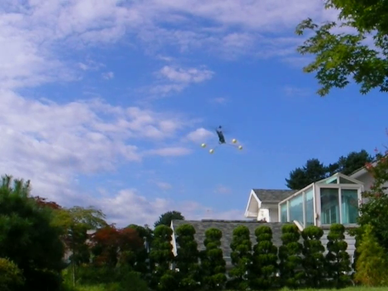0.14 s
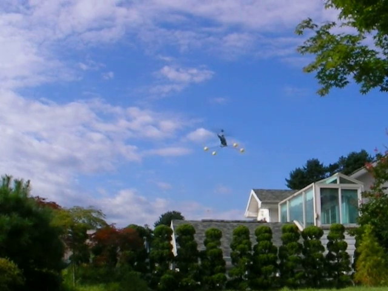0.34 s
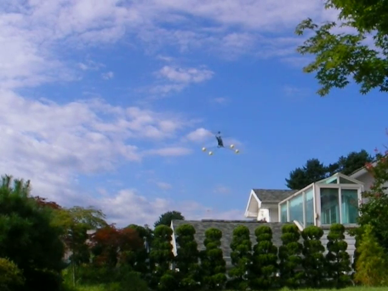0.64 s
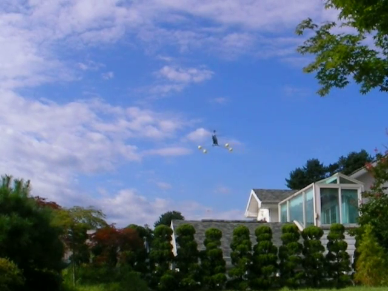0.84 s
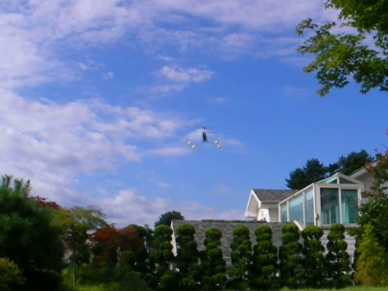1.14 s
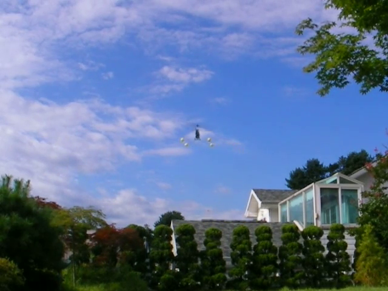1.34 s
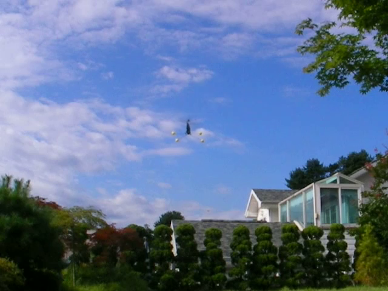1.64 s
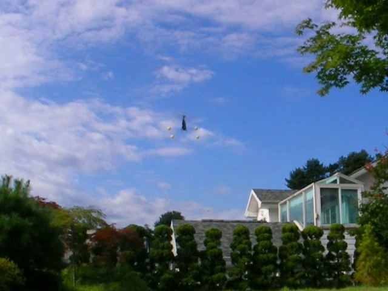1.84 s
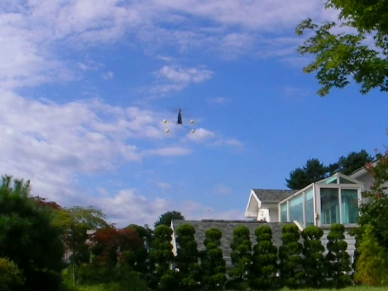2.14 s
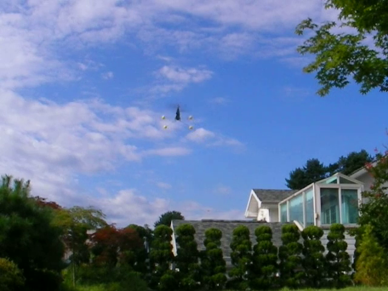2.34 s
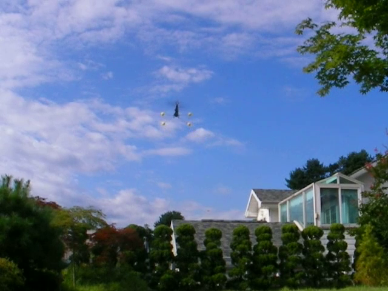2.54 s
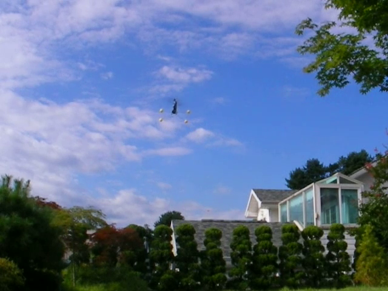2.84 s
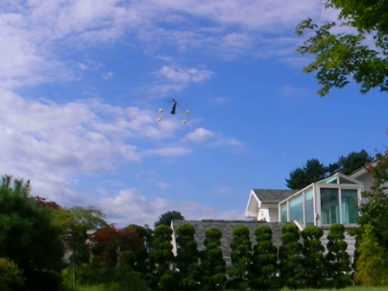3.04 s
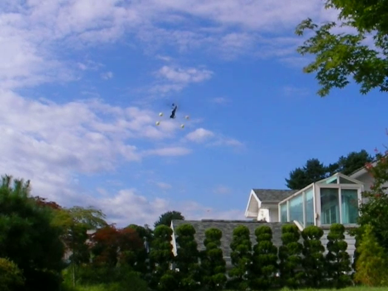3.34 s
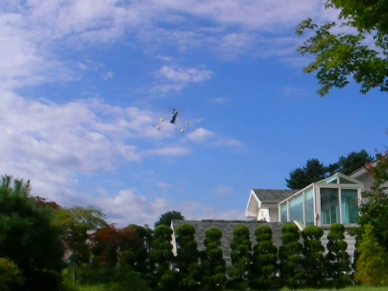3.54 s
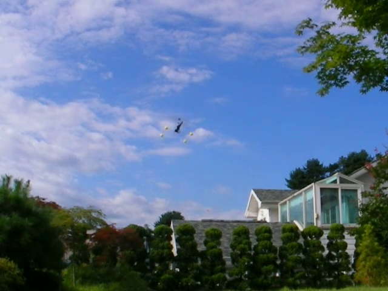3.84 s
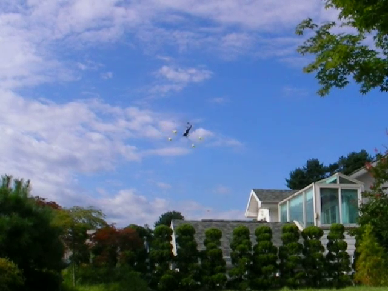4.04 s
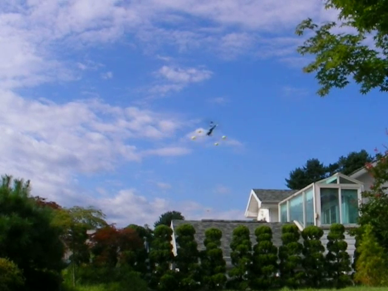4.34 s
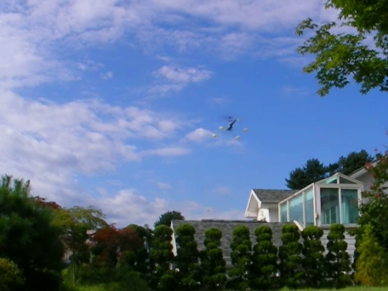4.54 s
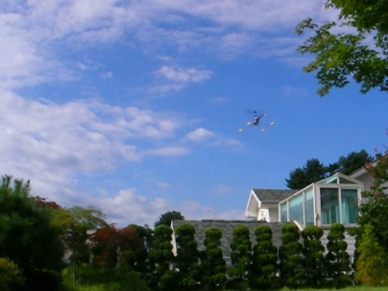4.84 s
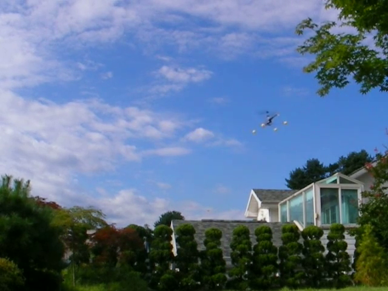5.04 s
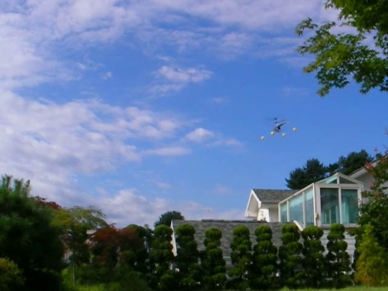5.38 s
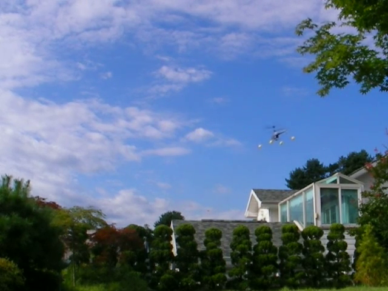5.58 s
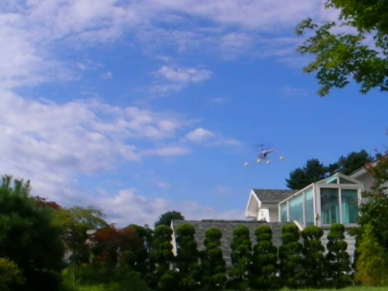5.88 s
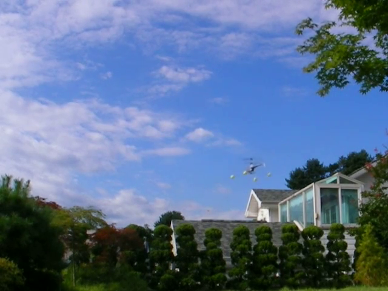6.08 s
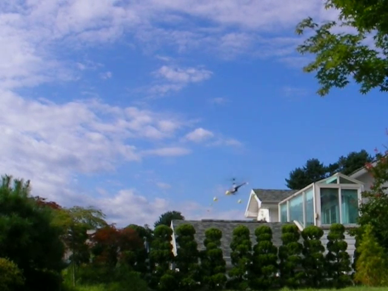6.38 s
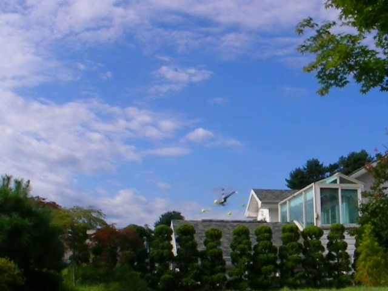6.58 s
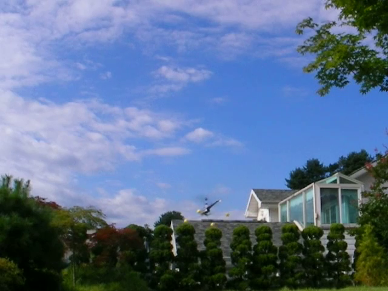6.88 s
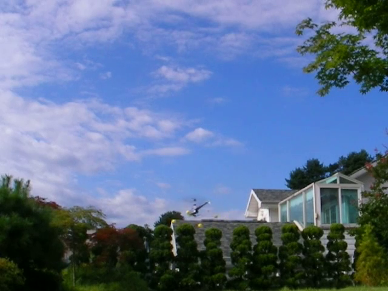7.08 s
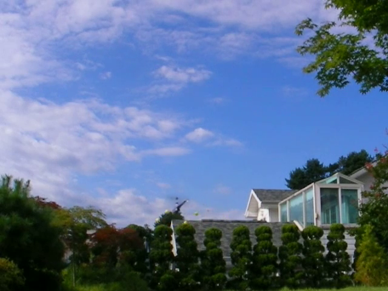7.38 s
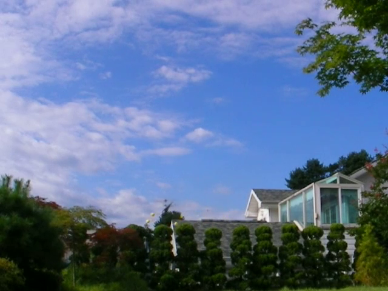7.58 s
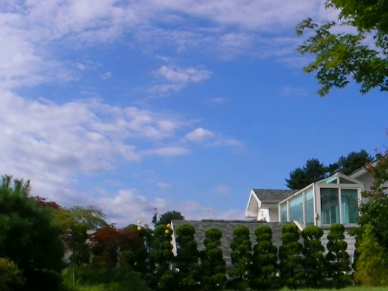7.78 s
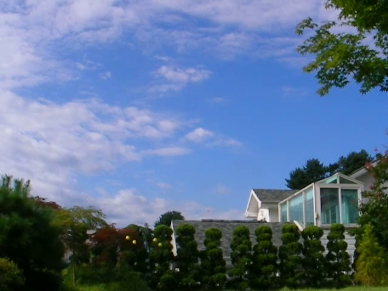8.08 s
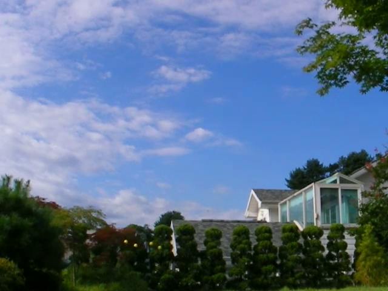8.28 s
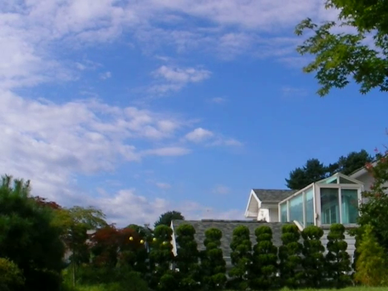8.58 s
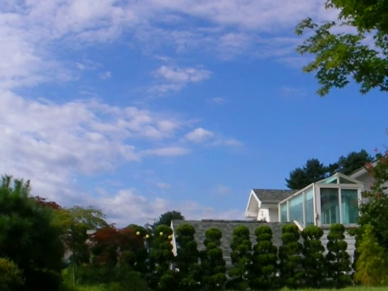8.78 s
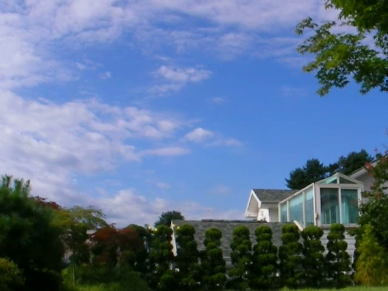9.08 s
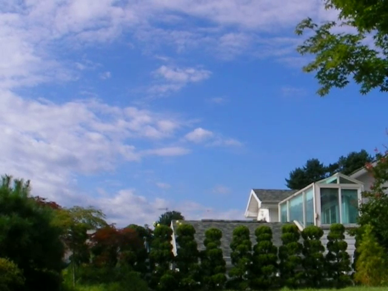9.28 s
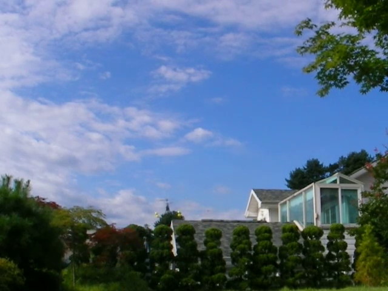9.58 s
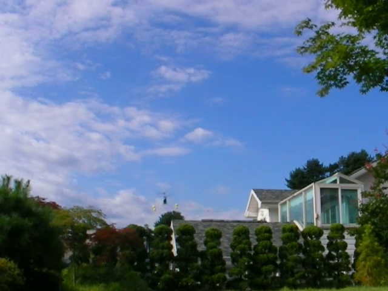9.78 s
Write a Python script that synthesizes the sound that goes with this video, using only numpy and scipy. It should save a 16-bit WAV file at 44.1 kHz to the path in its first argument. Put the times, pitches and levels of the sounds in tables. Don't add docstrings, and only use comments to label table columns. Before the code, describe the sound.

A small electric model helicopter whines and hisses over a windy garden, its pitch wavering, briefly sagging as power cuts, then recovering.

```python
import sys
import numpy as np
from scipy import signal
from scipy.fft import rfft, irfft
from scipy.io import wavfile
from scipy.ndimage import uniform_filter1d

SR = 44100
rng = np.random.default_rng(int(sys.argv[2]) if len(sys.argv) > 2 else 0)


def unload_audio(sound):
    columns = np.transpose(np.atleast_2d(sound))
    steps = np.round(np.clip(columns, -1, 1) * 32767)
    wavfile.write(sys.argv[1], SR, steps.astype(np.int16))


def to_linear_factor(level_db):
    exponent = np.asarray(level_db, float) / 20
    return 10 ** exponent


N = 437472
T = np.arange(N) / SR

# (frequency [Hz], likeness [0-1])
LIKENESS = [(60, 0.99), (300, 0.99), (700, 0.98), (1500, 0.82), (2500, 0.48), (4500, 0.45), (9000, 0.11),
            (13000, 0.53)]
# (time [s], buffeting [dB], tilt [dB per octave])
WIND = [(0.0, -15, 7), (0.5, -17.5, -4.5), (0.8, -16, -4), (1.0, -12.5, -1), (1.3, -14, 8), (1.5, -13.5, 1),
        (2.4, -16.5, 2), (3.1, -15, -3.5), (3.8, -15, -2), (4.15, -20, -4.5), (4.8, -18.5, -9),
        (5.6, -20.5, -2.5), (5.9, -21.5, -1.5), (6.7, -23.5, -1.5), (7.1, -18.5, -2.5), (7.7, -20.5, 2),
        (9.15, -29.5, -5.5), (9.92, -25, 2.5)]
# (frequency [Hz], density [dB per Hz])
BUFFET_COLOUR = [(12, -70), (20, -40), (27, -29), (35, -15), (43, -20), (135, -3.5), (177, 2.5), (272, -2),
                 (290, -5.5), (338, -21.5), (420, -25.5), (550, -35), (920, -120)]
# (frequency [Hz], density [dB per Hz])
RUSTLE_COLOUR = [(210, -11), (360, -9.5), (527, -6.5), (881, -8.5), (1680, -24), (2110, -22), (2790, -24.5),
                 (3500, -24.5), (4550, -43), (7700, -120)]
# (middle [s], half length [s], rustle [dB], low airflow [dB], tip hiss [dB])
GUSTS = [(0.0, 0.11, 3.5, -3, 1), (0.83, 0.019, 1.5, 3, 3), (0.9, .03, -2, -5, -4), (1.0, 0.018, 1, 2, 2),
         (1.08, 0.19, 6.5, -9, 1), (1.2, .03, -4, -3, -7), (1.27, 0.028, 1, -3, 4.5), (3.1, .3, 0, 0, 0),
         (5.5, 0.14, 2, -2, 2), (7.45, 0.45, 6, -1.5, -0.5), (8.3, 0.4, 2.5, -4, 0),
         (9.92, 0.091, 2.5, -1, -3)]
RUSTLE_DB, RUSTLE_SHARE, RUSTLE_FADE_DB_PER_S = -38, 0.58, -0.91
BUFFET_DIP_DB = -2.5

# (time [s], beat [Hz], beat level [dB], second overtone level [dB])
BEAT = [(0.0, 58.48, -31, -20.5), (2.4, 57.61, -29.5, -23), (3.9, 56.75, -31.5, -22),
        (5.2, 55.92, -35, -30.5), (5.6, 53.6, -47, -24.5), (7.8, 53.5, -44, -55), (8.2, 56.23, -45, -39),
        (9.92, 53.6, -51, -42)]
BOB_PERIOD_S, BOB_TOP_S, BOB_DB, BOB_SECOND_DB = 1.744, 0.57, 3, -1.5

# (time [s], frequency [Hz], level [dB])
CREAK = [
    (7.39, 1450, -65),
    (7.416, 1460, -53),
    (7.62, 1465, -55),
]

# (time [s], tip hiss [dB], canopy facing camera [dB], airflow over hiss [dB])
LOAD = [(0.0, -32, 2, -13.5), (0.7, -35, 3.5, -16.5), (1.1, -33.5, 7, -15.5), (1.8, -39.5, -2, -9.5),
        (3.2, -42.5, -11, -6), (3.7, -39.5, -5, -9.5), (3.95, -32.5, -6, -14.5), (4.45, -34, -10, -11.5),
        (4.8, -39, 0, -10), (5.6, -42, 6, -6), (6.3, -34, -14, -12), (7.04, -31, -11, -10.5),
        (7.4, -38, 4, -7.5), (7.75, -47, 24, 0.5), (8.18, -34.5, -8, -8), (8.6, -39.5, -8, -4),
        (8.95, -47.5, 13, 0), (9.75, -37.5, 18, -9)]
# (frequency [Hz], density [dB per Hz])
AIRFLOW_COLOUR = [(710, -12), (1200, -11.5), (1800, -18.5), (2800, -15.5), (3850, -11), (5200, -7.5),
                  (5800, -11.5), (6500, -9), (7300, -9), (8700, -6), (9600, -8.5), (11200, -2), (13800, -5)]
# (frequency [Hz], width [Hz], level against the moving band [dB])
CANOPY = [(8500, 430, -9), (12300, 430, 2.5)]
BLADE_PASS_HZ = 53.9
CHOP, CHOP_PER_DB, CHOP_NEAR, LEAVING_S = .25, .03, .35, 2.5
TIP_HZ, TIP_WIDTH_HZ, TIP_PER_MESH, HOVER_MESH_HZ = 11600, 520, 3.2, 2340
LOW_AIR_DB, LOW_AIR_FADE_DB_PER_S = 4, -0.22

# (time [s], tooth contacts [Hz])
TAIL_SPEED = [(0.0, 2162), (0.66, 2191), (0.96, 2075), (1.7, 2103), (2.55, 2086), (2.9, 2020), (3.55, 2026),
              (3.98, 2320), (4.5, 2240), (4.72, 2030), (5.05, 2095), (5.55, 1978), (6.4, 2250),
              (6.95, 2293), (8.4, 2240), (8.88, 2052), (9.3, 2192), (10.3, 1850)]
# (time [s], tooth contacts [Hz])
MAIN_SPEED = [(0.0, 2300), (0.32, 2261), (0.7, 2298), (1.44, 2211), (1.85, 2238), (2.56, 2236),
              (2.95, 2186), (3.5, 2174), (4.0, 2334), (4.47, 2358), (4.8, 2168), (5.52, 2150), (6.3, 2252),
              (7.04, 2504), (8.25, 2445), (8.95, 2262), (9.45, 2370), (10.1, 2280)]
# (time [s], level [dB])
TAIL_LEVEL = [(0.0, -45), (0.6, -66), (1.2, -50), (2.1, -56), (3.5, -50.5), (3.9, -50), (4.6, -53.5),
              (5.1, -45.5), (5.4, -47.5), (6.3, -43), (7.05, -45.5), (7.35, -43), (7.6, -54), (7.95, -48),
              (8.2, -52), (8.9, -46), (9.2, -49.5), (9.92, -55)]
# (time [s], level [dB], grinding over the gear [dB])
MAIN_LEVEL = [(0.0, -32, -10.5), (0.5, -39, -7.5), (1.8, -39.5, -11), (3.3, -44.5, -7.5), (3.6, -41.5, -12),
              (4.15, -35.5, -8.5), (4.8, -45, -4.5), (5.4, -41.5, -9), (5.8, -40.5, -13), (6.3, -41.5, 0.5),
              (7.1, -42, 2), (7.35, -32.5, -25), (7.62, -43.5, -6), (7.95, -35.5, -10), (8.15, -37.5, -7.5),
              (8.6, -42.5, -2), (8.9, -37, -13), (9.92, -41, -7.5)]
# (multiple of the tooth contacts, level [dB])
TAIL_ORDERS = [(1, -5.5), (2, -10), (3, 1.5)]
# (multiple of the tooth contacts, level [dB])
MAIN_ORDERS = [(1, -21), (2, -10.5), (3, -16), (4, -15.5), (5, -30)]
# (multiple of their mean, level [dB])
GRIND_ORDERS = [(1, -9), (2, -5.5)]
# (middle [s], half length [s], second [dB], third [dB])
SWINGS = [
    (1.75, 0.64, 9, 10),
    (3.1, 1, 7, 13.5),
    (5.0, .3, 2, 7),
    (7.3, .15, -2, -1),
    (7.7, 0.18, 11, 25),
    (8.25, 0.38, 21.5, -3),
    (8.9, 0.2, -8, 5),
    (9.3, 0.47, 11.5, 12),
]
# (frequency [Hz], width [Hz], lift over the direct sound [dB])
HOUSING = (4420, 860, 6)
SECOND_DB, THIRD_DB = -6, -22
# (fuzz width per overtone [Hz], clean share)
TAIL_ROUGH, MAIN_ROUGH, GRIND_ROUGH = (30, .86), (36, .86), (230, 0)
TEETH = 8
INERTIA_S, CUT_S, BACK_S = .07, 7.0, 7.72
TAIL_SAG, MAIN_SAG = (.22, .11), (.175, .17)  # (share of speed lost, recovery [s])
SIDE_DB = .5

# (frequency [Hz], gain [dB])
MICROPHONE = [(25, 5), (42, -19), (52, 2.5), (6800, 2.5), (7300, -1.5), (7600, -9), (7950, -36), (8300, -5),
              (8500, -2.5), (8900, 0)]
# (frequency [Hz], left over right [dB])
BALANCE = [(60, -1.5), (180, -1.0), (520, -0.5), (1540, -2), (4530, -0.5), (13400, 0.5)]


def evened(x):
    return x / np.sqrt(np.mean(x ** 2) + 1e-20)


def read(points, hz):
    f, value = np.transpose(points)
    return np.interp(np.log(hz + 1), np.log(f + 1), value)


def columns(rows, t):
    s, *rest = np.transpose(rows)
    return [np.interp(t, s, c) for c in rest]


def bumps(rows, t):
    return sum(np.outer(strength, np.exp(-((t - s) / half) ** 2)) for s, half, *strength in rows)


def wander(hz):
    step = 16
    slow = signal.lfilter(*signal.butter(2, hz * step / (SR / 2)), rng.standard_normal(N // step + 2))
    return np.interp(np.arange(N) / step, np.arange(len(slow)), evened(slow))


def line(hz, width_hz, clean):
    fuzz = (wander(width_hz / 2) + 1j * wander(width_hz / 2)) / np.sqrt(2)
    turn = np.exp(2j * np.pi * (np.cumsum(hz) / SR + rng.random()))
    fuzz_share = np.sqrt(1 - np.clip(clean, 0, 1) ** 2)
    return np.sqrt(2) * (turn * (clean + fuzz_share * fuzz)).real


def noise(shape_db, band, patchy_db, size):
    hop = size // 4
    t = np.arange(N // hop + 5) * hop / SR
    hz = np.fft.rfftfreq(size, 1 / SR)[:, None]
    a, b, c, d, patches = rng.standard_normal((len(t), len(hz), 5)).T
    patches = uniform_filter1d(patches, size=6, axis=0)
    patches = evened(uniform_filter1d(patches, size=12, axis=1))
    gain = to_linear_factor(shape_db(hz, t)) * np.ones(len(t))
    inside = (hz >= band[0]) & (hz <= band[1])
    gain = gain / np.sqrt((gain ** 2 * inside).sum(0)) * to_linear_factor(patchy_db * patches)
    same = np.clip(read(LIKENESS, hz), -1, 1)
    left = a + 1j * b
    right = same * left + np.sqrt(1 - same ** 2) * (c + 1j * d)
    z = np.array([left, right]) * gain
    return signal.istft(z, nperseg=size, noverlap=size - hop)[1][:, :N] * 0.72


def mesh(speed, sag):
    s, hz = np.transpose(speed)
    points = np.arange(len(s))
    place = np.interp(T, s, points)
    eased = np.interp(place // 1 + np.sin(np.pi / 2 * (place % 1)) ** 2, points, hz)
    run_down = np.clip((T - CUT_S) / (BACK_S - CUT_S), 0, 1)
    recovery = np.exp(-np.maximum(T - BACK_S, 0) / sag[1])
    return uniform_filter1d(eased * (1 - sag[0] * run_down * recovery), round(INERTIA_S * SR))


def buffet_db(hz, t):
    tilt_db = columns(WIND, t)[1]
    octaves = np.log2((hz + 20) / 170)
    dip = np.exp(-((hz - 200) / 35) ** 2)
    return read(BUFFET_COLOUR, hz) + tilt_db * octaves + BUFFET_DIP_DB * dip


def rustle_colour_db(hz, t):
    return read(RUSTLE_COLOUR, hz)


def wind():
    level_db = columns(WIND, T)[0]
    rustle_db = RUSTLE_DB + RUSTLE_SHARE * (level_db - level_db.mean())
    rustle_db = rustle_db + RUSTLE_FADE_DB_PER_S * T + bumps(GUSTS, T)[0]
    flutter_db = 1.44 * wander(41)
    buffet = to_linear_factor(level_db) * noise(buffet_db, (70, 330), patchy_db=1.5, size=4096)
    rustle = noise(rustle_colour_db, (400, 1500), patchy_db=1.5, size=1024)
    return buffet + to_linear_factor(rustle_db + flutter_db) * rustle


def beat():
    hz, first_db, second_db = columns(BEAT, T)
    bob = np.cos(2 * np.pi * (T - BOB_TOP_S) / BOB_PERIOD_S)
    first_db = first_db + BOB_DB * bob
    second_db = second_db + BOB_SECOND_DB * bob
    overtones = line(2 * hz, 17.4, 0.65)
    overtones += to_linear_factor(-17.5) * line(3 * hz, 17.0, 0.35)
    overtones += to_linear_factor(-8.0) * line(4 * hz, 14, 0.26)
    overtones += to_linear_factor(-12.0) * line(5 * hz, 21.0, 0.35)
    return to_linear_factor(first_db) * line(hz, 4.3, 1.0) + to_linear_factor(second_db - 3.0) * overtones


def creak():
    hz, level_db = columns(CREAK, T)
    sounding = 1. * (T > CREAK[0][0]) * (T < CREAK[-1][0])
    sounding = uniform_filter1d(sounding, size=900)
    return to_linear_factor(level_db - 1.0) * sounding * line(hz, 24.2, 0.64)


def tip_centre(t):
    main_hz = np.interp(t, T, mesh(MAIN_SPEED, MAIN_SAG))
    return TIP_HZ + TIP_PER_MESH * (main_hz - HOVER_MESH_HZ)


def shaft():
    hiss_db, canopy_db, _ = columns(LOAD, T)
    centre_hz = 300 + tip_centre(T)
    hz = mesh(TAIL_SPEED, TAIL_SAG) / TEETH
    phase = 2 * np.pi * np.cumsum(hz * (1 + .002 * wander(30))) / SR
    starts = 2 * np.pi * rng.random(60)
    comb = np.zeros(N)
    for k in range(34, 52):
        comb += np.cos(k * phase + starts[k]) / (1 + ((k * hz - centre_hz) / 1300) ** 2)
    return to_linear_factor(.6 * hiss_db - 25.5 - .3 * canopy_db) * evened(comb)


def tip_db(hz, t):
    away = hz - tip_centre(t)
    power = 1 / (1 + (away / TIP_WIDTH_HZ) ** 4) + 0.21 / (1 + (away / 1500) ** 4)
    canopy_db = columns(LOAD, t)[1]
    for centre_hz, width_hz, db in CANOPY:
        band_db = db + canopy_db * (centre_hz > 1e4)
        power = power + to_linear_factor(2 * band_db) / (1 + ((hz - centre_hz) / width_hz) ** 4)
    return 10 * np.log10(power)


def air_db(hz, t):
    low_db = LOW_AIR_DB + LOW_AIR_FADE_DB_PER_S * t + bumps(GUSTS, t)[1]
    return read(AIRFLOW_COLOUR, hz) + low_db / (1 + (hz / 4500) ** 6)


def blades():
    hiss_db, _, flow_db = columns(LOAD, T)
    depth = CHOP + CHOP_PER_DB * (hiss_db - hiss_db.mean()) + CHOP_NEAR * np.exp(-(T / LEAVING_S) ** 2)
    depth = np.clip(depth * (1 + 0.23 * wander(12.0)), 0, 1)
    phase = 2 * np.pi * np.cumsum(BLADE_PASS_HZ * (1 + 0.0437 * wander(7.0))) / SR
    chop = 1 + depth * np.cos(phase)
    tips = to_linear_factor(hiss_db + bumps(GUSTS, T)[2]) * noise(tip_db, (9500, 13500), patchy_db=3.0, size=512)
    air = to_linear_factor(hiss_db + flow_db) * noise(air_db, (5300, 7300), patchy_db=1.23, size=1024)
    return tips * chop + air * (1 + 0.079 * (chop - 1))


def gears():
    tail_hz, main_hz = mesh(TAIL_SPEED, TAIL_SAG), mesh(MAIN_SPEED, MAIN_SAG)
    tail_db, = columns(TAIL_LEVEL, T)
    main_db, grind_db = columns(MAIN_LEVEL, T)
    second_db, third_db = bumps(SWINGS, T) + [[SECOND_DB], [THIRD_DB]]
    centre_hz, width_hz, lift_db = HOUSING
    swing_depth_hz = 30 * (1 + .4 * wander(4))
    swing_hz = swing_depth_hz * np.cos(2 * np.pi * BLADE_PASS_HZ * T + .6 * wander(5)) + 4 * wander(8)
    trains = [(tail_hz + swing_hz / 3, tail_db, TAIL_ORDERS, TAIL_ROUGH),
              (main_hz + swing_hz, main_db, MAIN_ORDERS, MAIN_ROUGH),
              ((tail_hz + main_hz) / 2, main_db + grind_db, GRIND_ORDERS, GRIND_ROUGH)]
    out = np.zeros((2, N))
    for hz, level_db, orders, (fuzz_hz, clean) in trains:
        for k, db in orders:
            lift = lift_db / (1 + (2 * (k * hz - centre_hz) / width_hz) ** 2)
            lift = lift + third_db * (k == 3)
            lift = lift + second_db * (k == 2) * (orders is TAIL_ORDERS)
            spread_hz = k * fuzz_hz * (1 + 2 * (k > 3))
            direct = line(k * hz, spread_hz, clean * (k < 4) - .15 * (k == 3))
            scattered = line(k * hz, spread_hz, .5 * clean) * np.array([[1], [-1]])
            out += to_linear_factor(level_db + db + lift) * (direct + 0.35 * scattered)
    return out


def scene():
    flicker = to_linear_factor(0.52 * wander(7.2) + 0.8 * wander(68))
    side = to_linear_factor(np.outer([.5, -.5], SIDE_DB))
    craft = (creak() + shaft() + blades() + gears()) * flicker * side
    return wind() + beat() + craft


def masked(x):
    hz, _, z = signal.stft(x, SR, nperseg=2048)
    width, edge_hz, margin_db = 6, 13560, 6.3
    power = (abs(z) ** 2).mean(0)
    level_db = 10 * np.log10(uniform_filter1d(power, size=width, axis=0) + 1e-20)
    band_middle = np.arange(len(hz)) // width * width + width // 2
    band_db = level_db[np.minimum(band_middle, len(hz) - 1)]
    around_db = uniform_filter1d(level_db, size=140, axis=0)
    kept = (band_db > around_db - margin_db) | (hz[:, None] < 2300)
    return signal.istft(z * kept * (hz[:, None] < edge_hz), SR, nperseg=2048)[1][:, :N]


def band_limit(x):
    return signal.sosfilt(signal.butter(12, 13950, fs=SR, output="sos"), x)


def record(dry):
    hz = np.fft.rfftfreq(N, 1 / SR)
    colour_db = read(MICROPHONE, hz) + np.outer([.5, -.5], read(BALANCE, hz))
    heard = irfft(rfft(dry) * to_linear_factor(colour_db), N)
    limited = heard / (1 + abs(heard / .8) ** 6) ** (1 / 6)
    return band_limit(masked(limited))


dry = scene()
out = record(dry)
unload_audio(out)
```